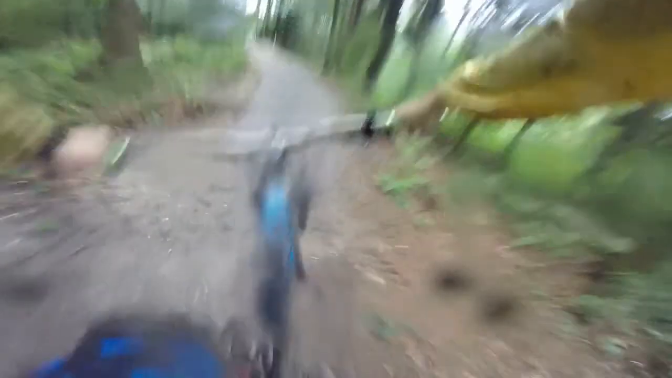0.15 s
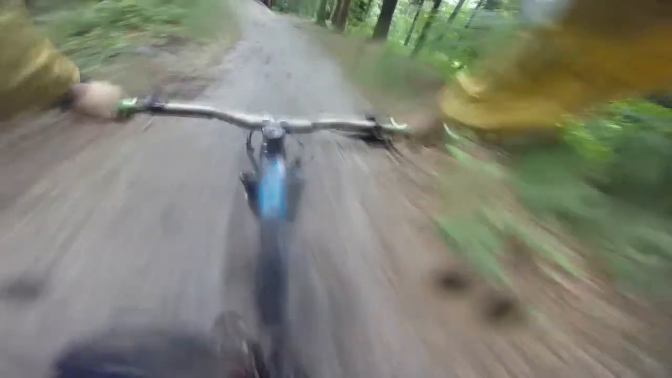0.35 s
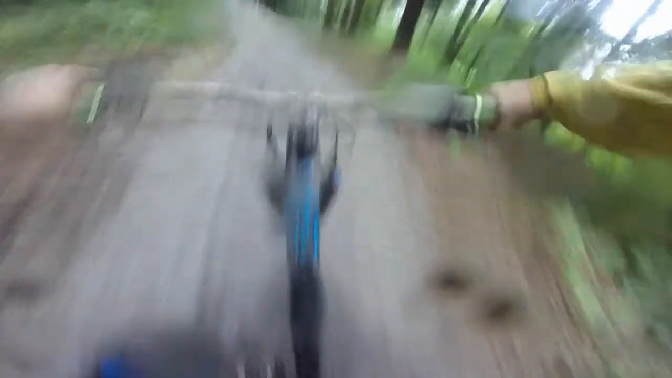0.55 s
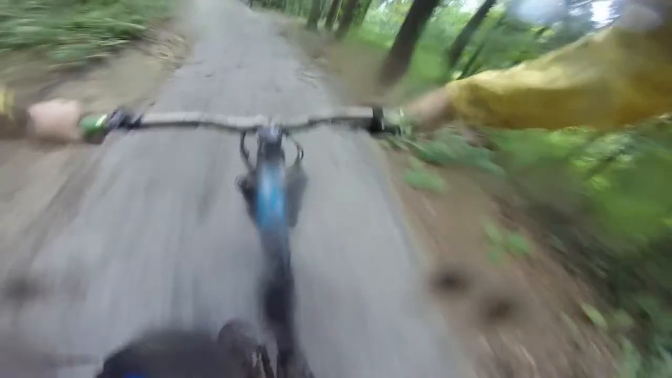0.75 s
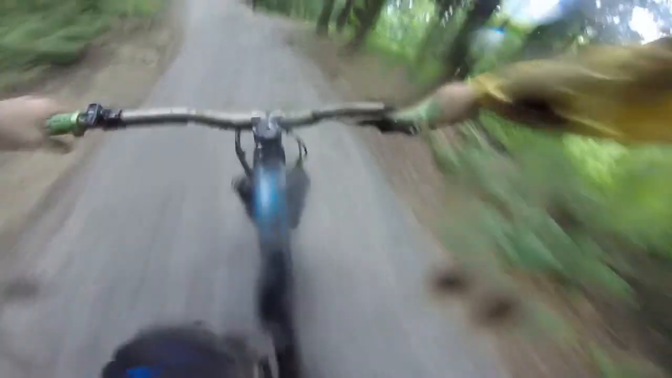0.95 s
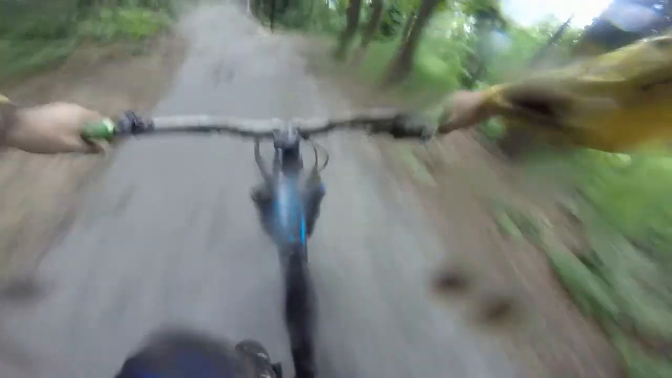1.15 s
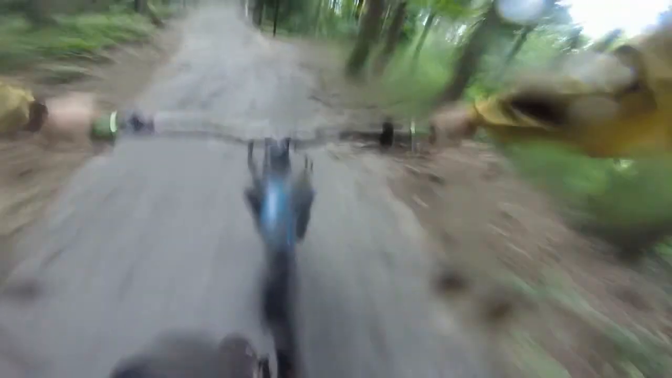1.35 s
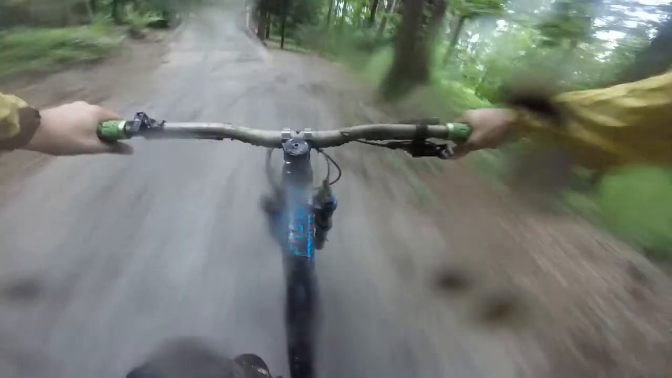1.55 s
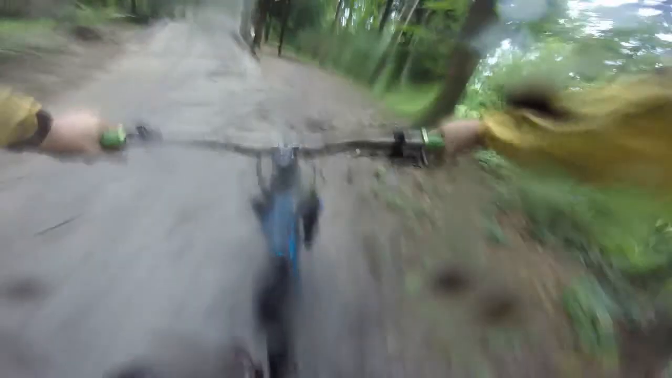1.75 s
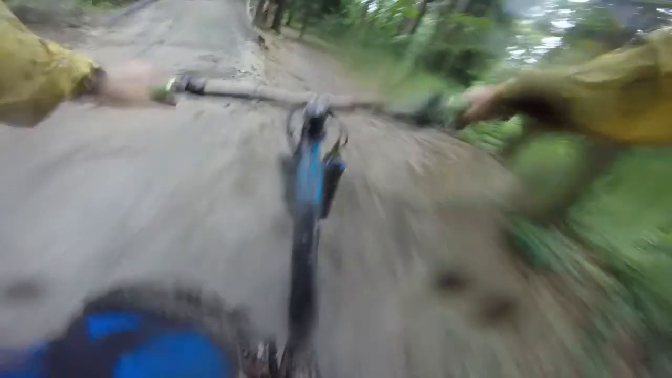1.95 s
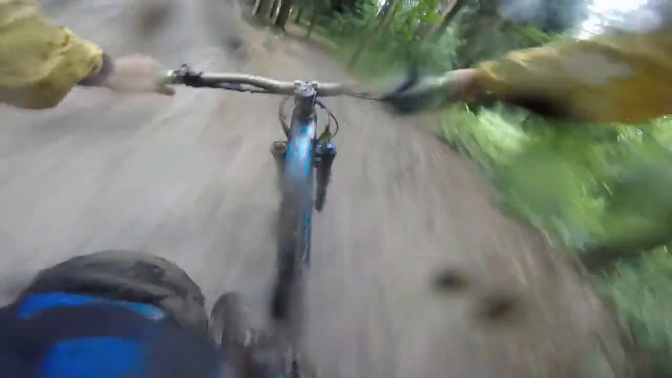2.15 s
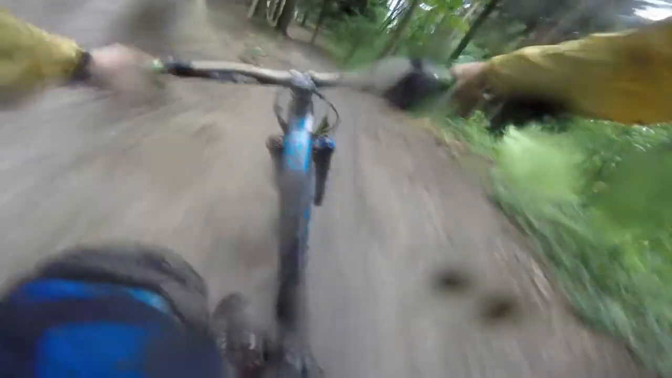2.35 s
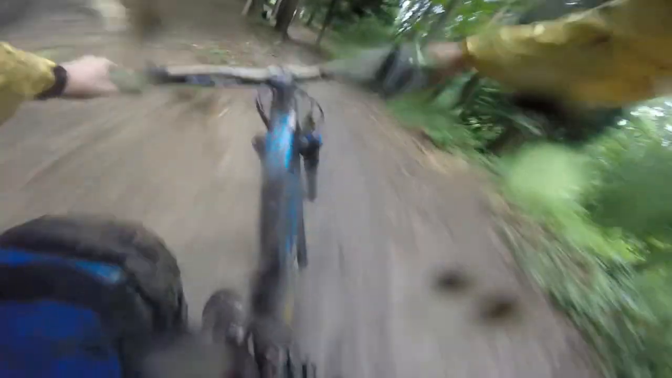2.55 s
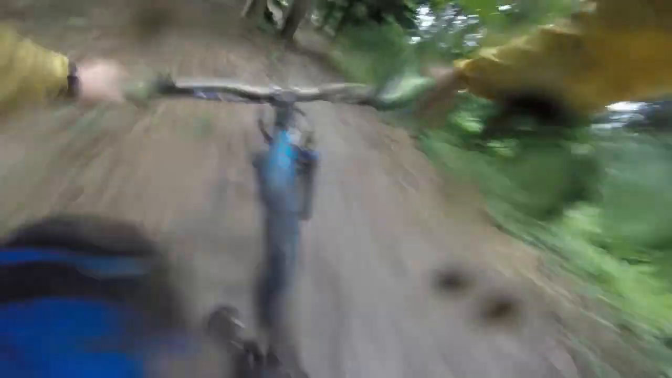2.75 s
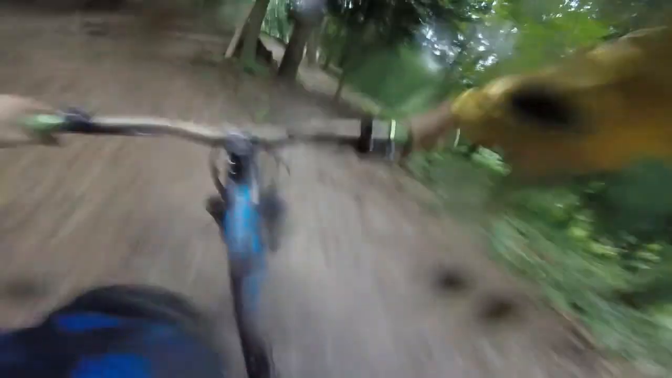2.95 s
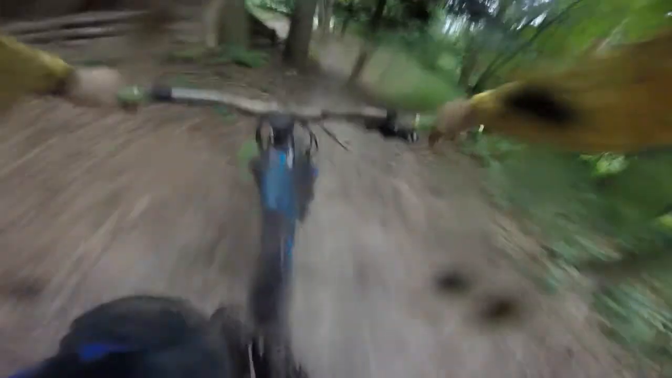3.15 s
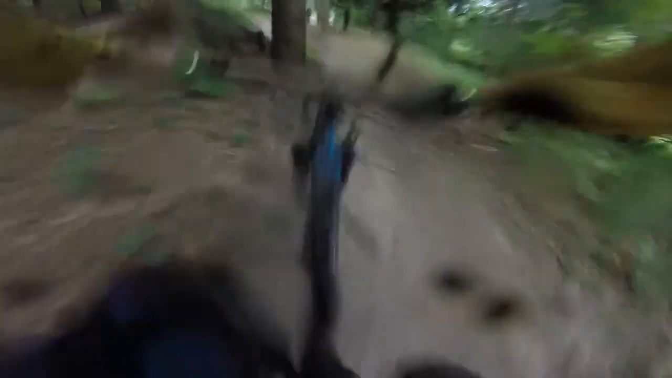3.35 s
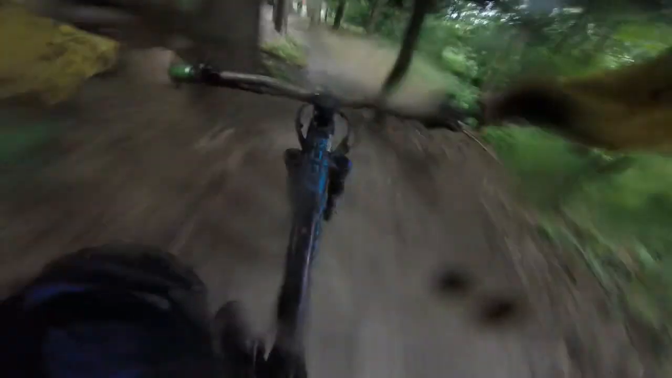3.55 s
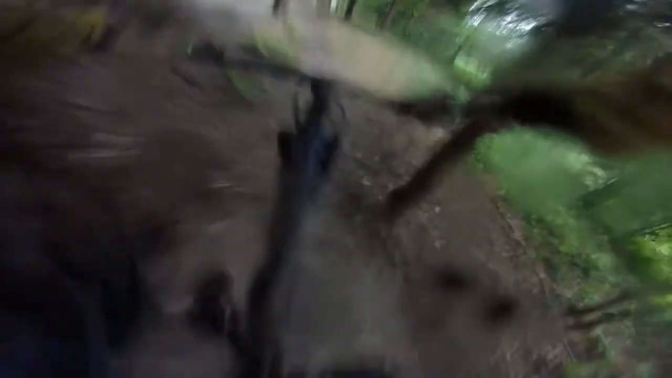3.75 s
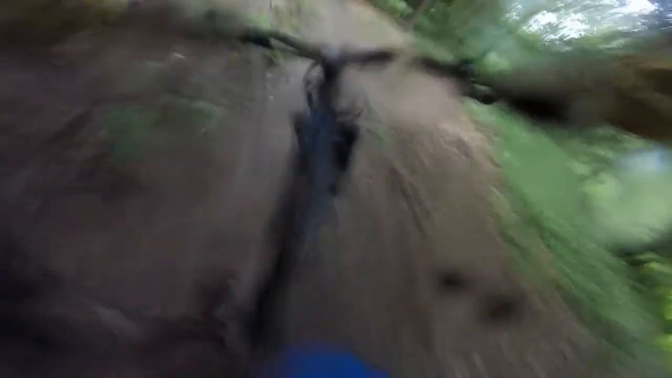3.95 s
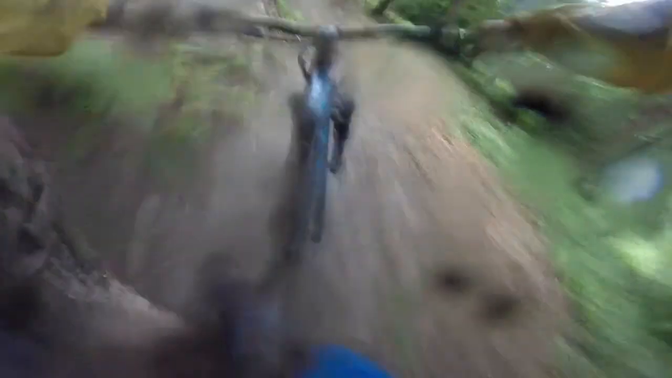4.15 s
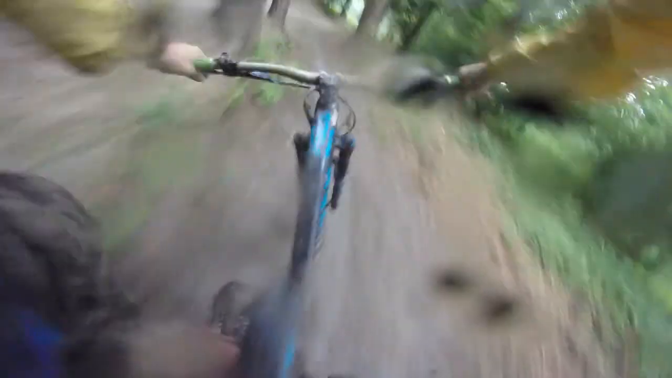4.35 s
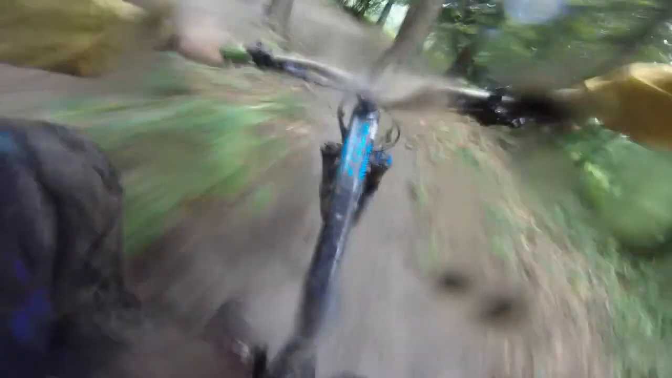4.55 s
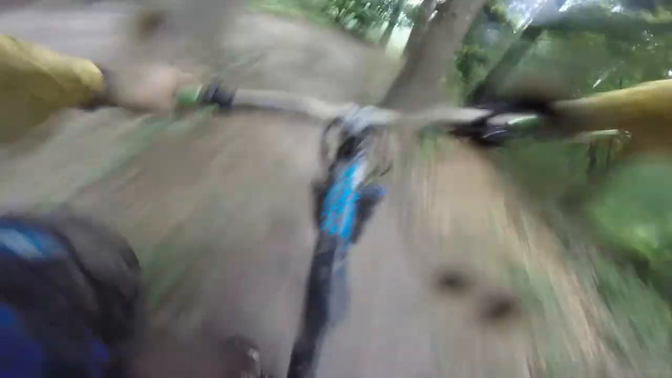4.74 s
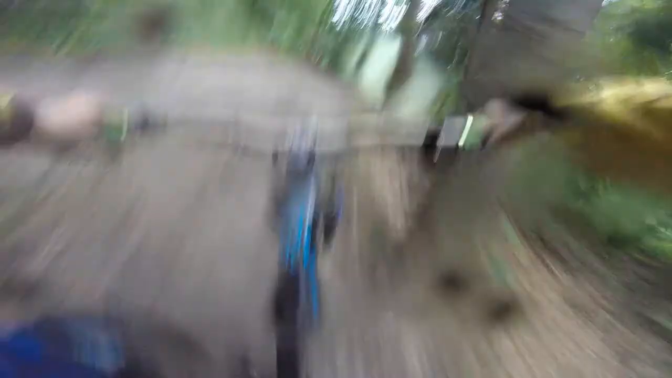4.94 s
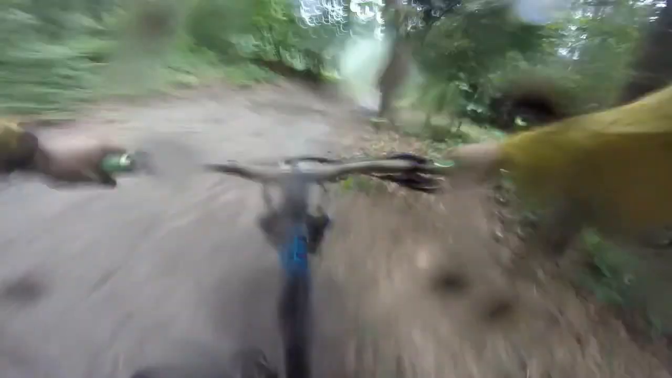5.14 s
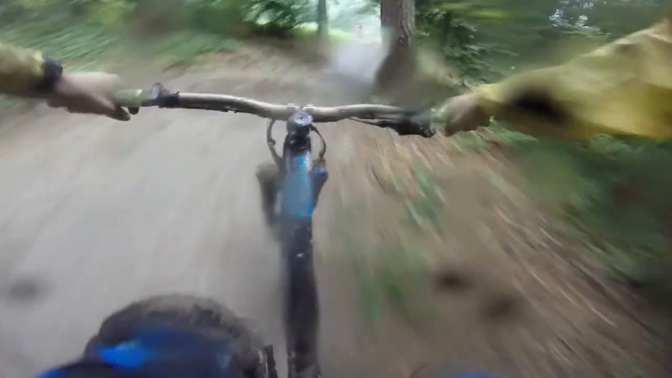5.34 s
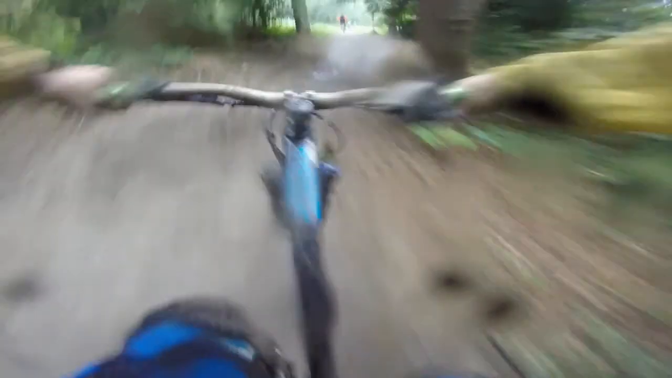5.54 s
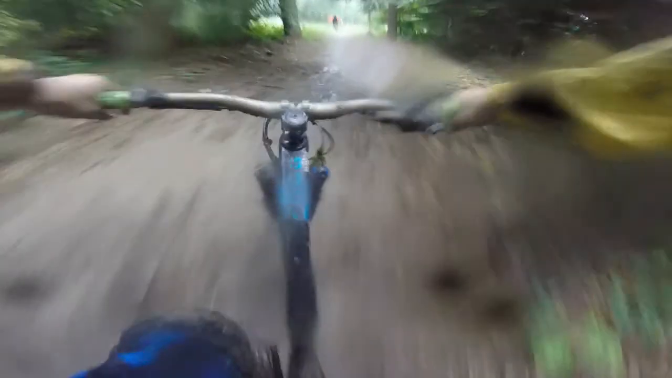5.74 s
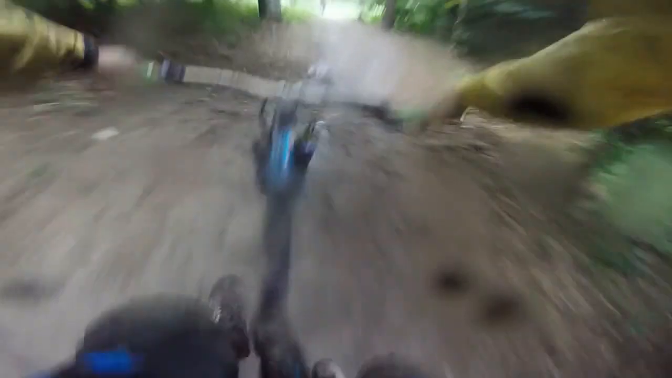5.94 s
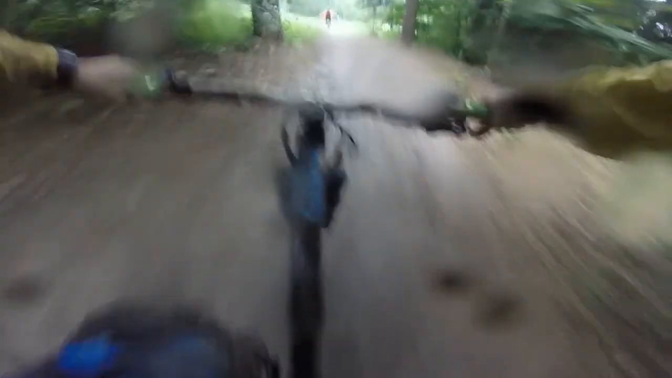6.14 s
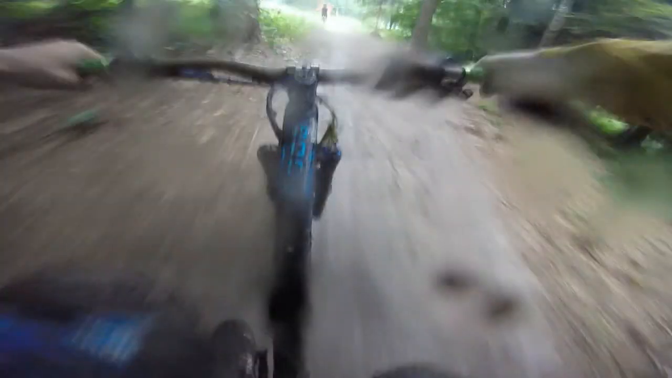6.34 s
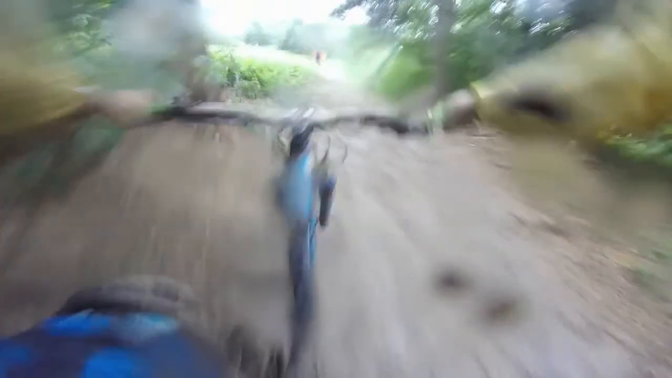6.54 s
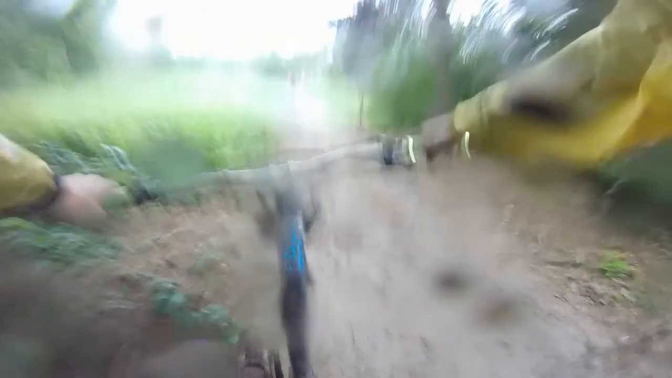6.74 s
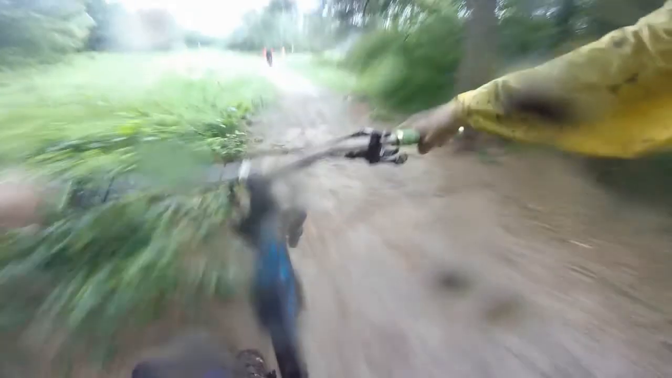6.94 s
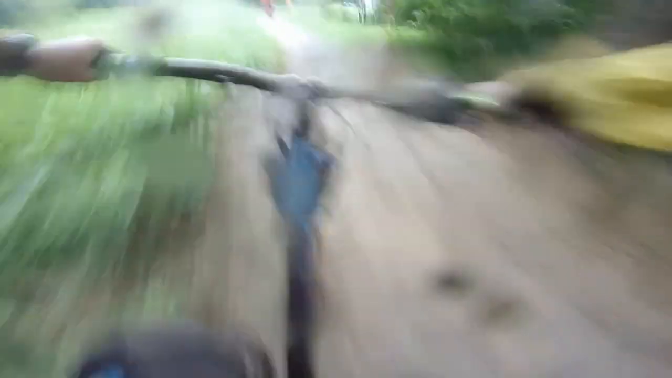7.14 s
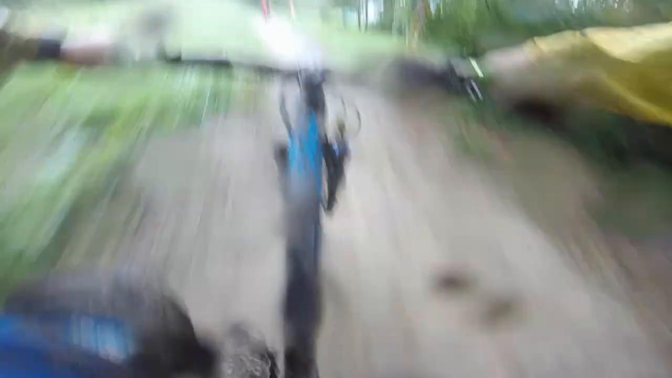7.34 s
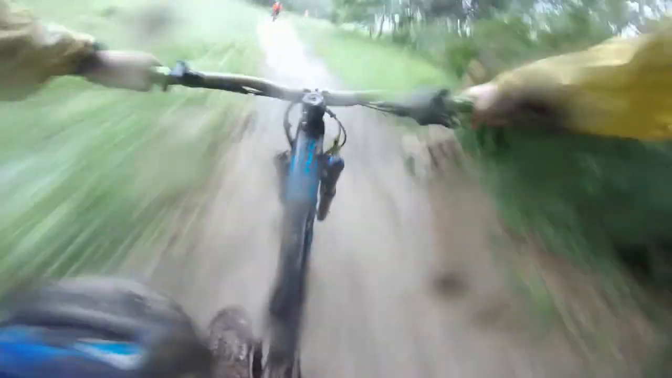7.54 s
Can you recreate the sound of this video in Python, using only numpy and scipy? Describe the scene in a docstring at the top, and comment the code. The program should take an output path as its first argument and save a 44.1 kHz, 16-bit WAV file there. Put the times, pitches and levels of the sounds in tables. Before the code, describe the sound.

Close rattling, clacks and hollow thuds of a mountain bike speeding over gritty dirt, with hissing brakes and buffeting air.

```python
"""Mountain bike on a dirt trail.

A fast descent, heard from a cased camera on the rider's chest. Tyres crunch over grit, disc brakes
hiss and briefly squeal, chain and cables clack against the frame. Air buffets the case;
bumps knock the camera mount and push deep thuds into the case."""
import sys
import numpy as np
from scipy import signal
from scipy.fft import rfft, irfft
from scipy.io import wavfile
from scipy.ndimage import uniform_filter1d

SR = 44100
rng = np.random.default_rng(int(sys.argv[2]) if len(sys.argv) > 2 else 0)


def pcm_store(signal):
    """Save signal as 16-bit PCM."""
    levels = np.round(np.clip(np.atleast_2d(signal), -1, 1) * 32767)
    wavfile.write(sys.argv[1], SR, levels.astype(np.int16).T)


N = 339129
TIME = np.arange(N) / SR
LEAD_S = 0.008  # a brief swell of noise leads into each hit

# Knocks on the camera mount. Each row: start in seconds, crack level in dB, ring in Hz,
# boom level in dB, hollow level in dB; boom and hollow before the trims in mount_knocks().
MOUNT_KNOCKS = [(0.035, -10, 1900, -26, -33), (0.511, -16, 1160, -17, -24), (0.594, -26, 1300, -40, -45),
                (0.606, -20, 1220, -31, -25.5), (0.613, -30, 1190, -20, -30), (0.6849, -6, 2020, -10, -12),
                (1.202, -32.5, 1190, -31, -48), (1.534, -23.5, 1180, -26, -46),
                (1.641, -37, 1100, -29, -36), (2.075, -25.5, 1170, -23.5, -58),
                (2.227, -28.5, 1200, -28, -39), (2.348, -18.5, 1830, -34, -33.5),
                (2.462, -16.5, 1220, -28, -52), (2.859, -24, 1180, -24.5, -42),
                (2.981, -27, 2170, -32, -34), (3.092, -24, 1700, -42, -55), (3.14, -21.5, 2220, -24, -29),
                (3.511, -15.5, 2200, -22.5, -27), (3.556, -48, 2760, -23.5, -51),
                (3.976, -21, 1180, -14.5, -27), (4.046, -26, 1070, -17, -26.5),
                (4.079, -21, 1260, -49, -37), (4.166, -15, 1220, -20.5, -26.5),
                (4.238, -22, 2230, -18.5, -26.5), (4.276, -21, 1880, -33, -32),
                (4.395, -20, 2220, -40, -28.5), (4.43, -15, 1930, -24, -27.5),
                (4.445, -2.5, 2300, -15, -28), (4.591, -21.5, 1150, -24, -33.5),
                (4.893, -22, 1170, -24, -31), (4.961, -4, 2850, -9, -7.5), (5.233, -37, 2330, -31, -37),
                (5.308, -24, 2580, -30, -30), (5.611, -24.5, 1140, -18.5, -37),
                (5.652, -33, 1230, -24, -41), (6.0521, -17.5, 1120, -21.5, -25),
                (6.364, -18, 2180, -32.5, -30), (6.533, -22, 1130, -18.5, -53),
                (6.618, -19.5, 1850, -13, -47), (6.715, -16, 2240, -16, -21.5),
                (6.757, -6.5, 1940, -16, -29), (6.839, -12.5, 2340, -13, -21),
                (7.241, -21.5, 1150, -19.5, -30.5)]
# Modes of frame and chain. Each row: frequency in Hz, gain in dB, t60 in seconds.
FRAME_MODES = [(1500, 5.5, 0.0043), (2060, -6, 0.03), (2293, -5.5, 0.027), (2620, -1, 0.017),
               (3426, -8.5, 0.011), (3704, -19, 0.039)]


def undb(db):
    """Decibels to gain."""
    return 10 ** (np.asarray(db) / 20)


def unit(x):
    """Scale to rms 1."""
    return x / np.sqrt(np.mean(x ** 2))


def peak(x, db):
    """Scale to a peak level."""
    return x * undb(db) / np.abs(x).max()


def add(out, start_s, x):
    """Mix x into out."""
    i = int(start_s * SR)
    x, i = x[max(-i, 0):], max(i, 0)
    out[i:i + len(x)] += x[:N - i]


def curve(table):
    """Each value column of (seconds, value, ..) rows, interpolated linearly."""
    times_s, *columns = np.transpose(table)
    return [np.interp(TIME, times_s, column) for column in columns]


def swells(table):
    """Gaussian humps in dB from (centre in seconds, half length in seconds, dB) rows."""
    return sum(db * np.exp(-((TIME - centre_s) / half_s) ** 2) for centre_s, half_s, db in table)


def band(x, lo_hz, hi_hz):
    """Butterworth band-pass."""
    return signal.sosfilt(signal.butter(2, [lo_hz, hi_hz], "band", fs=SR, output="sos"), x)


def colour(x, spectrum, size=2048):
    """Minimum-phase filter through (Hz, dB) points."""
    hz, db = np.transpose(spectrum)
    grid_hz = np.maximum(np.arange(size // 2 + 1) * SR / size, 1)
    gain = undb(np.interp(np.log(grid_hz), np.log(hz), db))
    cepstrum = irfft(np.log(gain))
    cepstrum[1:size // 2] *= 2
    cepstrum[size // 2 + 1:] = 0
    return signal.fftconvolve(x, irfft(np.exp(rfft(cepstrum))))[:len(x)]


def ring(push, modes, detune=0.0):
    """Damped modes driven by a push; each blow lands elsewhere and detunes them a little."""
    t = TIME[:len(push)]
    response = np.zeros(len(push))
    for hz, db, t60_s in modes:
        hz = hz * (1 + detune * rng.standard_normal())
        response += undb(db) * np.cos(2 * np.pi * hz * t) * undb(-60 * t / t60_s)
    return signal.fftconvolve(push, response)[:len(push)]


def walk(rate_hz):
    """Random steps, smoothed twice, at rms 1."""
    hold = int(SR / rate_hz)
    steps = np.repeat(rng.standard_normal(N // hold + 1), hold)
    return unit(uniform_filter1d(uniform_filter1d(steps, hold), hold)[:N])


def grains(per_s, spread_db):
    """Random impulses, many small and a few large."""
    height = undb(spread_db * np.minimum(rng.exponential(size=N), 5))
    return (rng.random(N) < per_s / SR) * height * rng.choice([-1, 1], N)


def contacts(span_s, scrape_s, shiver_db, shiver_s, count, scatter_db=3.5, size=4000):
    """Quick scraping contacts of uneven force; loose parts shiver on after them."""
    t = TIME[:size] - LEAD_S
    push = np.zeros(size)
    for when_s in span_s * (np.arange(count) + rng.random(count) / 2) / count:
        push += undb(scatter_db * rng.standard_normal()) * np.exp(-np.abs(t - when_s) / scrape_s)
    lead_in = np.exp(np.minimum(t, 0) / 0.0012)
    shiver = undb(shiver_db) * lead_in * np.exp(-np.maximum(t, 0) / shiver_s)
    return (push + shiver) * rng.standard_normal(size)


def buffeting(trim_db=1.5):
    """Gusts and body sway buffet the case in lumps."""
    # Each row: time in seconds, level before trim in dB.
    gusts = [(0, -26.5), (.4, -41), (.64, -28), (.9, -45.5), (1.25, -32), (1.6, -36.5), (2.7, -31),
             (2.9, -28.5), (3.35, -33), (4.4, -28.5), (4.9, -27), (5.05, -35.5), (5.95, -41), (6.3, -30.5),
             (6.7, -27), (6.98, -63.5), (7.35, -30), (7.69, -35)]
    # Each row: frequency in Hz, relative density in dB.
    buffet_spectrum = [(5, 7), (13, 5), (22, 10.5), (38, -8), (60, -15.5), (100, -17.5), (200, -46),
                       (2000, -120)]
    level_db, = curve(gusts)
    rumble = unit(colour(rng.standard_normal(N), buffet_spectrum, size=32768))
    return rumble * undb(level_db + trim_db + 2.55 * walk(rate_hz=7.2))


def mount_drone(level_db, trim_db=5.7):
    """Small bumps keep the camera mount droning."""
    # Each row: frequency in Hz, relative density in dB.
    drone_spectrum = [(20, -43), (60, 0), (90, -8), (150, 0), (208, -1), (250, -6.5), (320, -17),
                      (500, -32.5), (900, -81), (4000, -100)]
    drone = unit(colour(grains(per_s=170, spread_db=3), drone_spectrum, size=8192))
    return drone * undb(level_db + trim_db + 2 * walk(rate_hz=25))


def brake_hiss(graze_db=-66, trim_db=4):
    """Dusty pads slip on the rotor and excite its broad resonances; released, they still graze it."""
    # Lever pulls. Each row: start, length, squeeze and release in seconds, level before trim in dB.
    pulls = [(0.452, 0.17, 0.0069, 0.059, -50), (.75, 0.14, 0.047, .05, -60),
             (1.672, 0.054, 0.046, 0.051, -53.5), (2.22, 0.75, 0.26, .09, -51), (3.81, 1, 0.091, 0.08, -63),
             (6.51, 0.21, 0.11, 0.044, -59), (7.246, 0.41, 0.058, .05, -67)]
    # Each row: frequency in Hz, relative density in dB.
    rotor_spectrum = [(1200, -22), (2300, -14), (2900, 6.5), (3300, -4), (3800, 1.5), (4600, -12.5),
                      (6100, -2), (7700, -9.5), (9000, -3.5), (10500, -18), (12500, -22), (15000, -33)]
    drag = undb(graze_db)
    for start_s, length_s, squeeze_s, release_s, db in pulls:
        t = TIME - start_s
        grip = np.clip(t / squeeze_s, 0, 1) * np.exp(-np.maximum(t - length_s, 0) / release_s)
        drag = np.hypot(drag, undb(db) * grip)
    pressure = undb(1.8 * walk(rate_hz=70))
    slips = grains(per_s=9000, spread_db=3.5) * pressure
    return unit(colour(slips, rotor_spectrum)) * drag * undb(trim_db)


def brake_squeals(waver=0.03):
    """The rotor catches a pad and sings for an instant on an unsteady pitch."""
    # Each row: centre in seconds, half length in seconds, pitch in Hz, peak in dB.
    squeals = [(2.363, 0.0024, 7060, -33), (2.832, 0.0029, 2005, -25), (3.046, .008, 6840, -35),
               (3.096, 0.0016, 1674, -14)]
    clock_s = np.cumsum(1 + waver * walk(rate_hz=900)) / SR
    out = np.zeros(N)
    for centre_s, half_s, hz, db in squeals:
        envelope = undb(db) * np.exp(-((TIME - centre_s) / half_s) ** 2)
        out += envelope * np.sin(2 * np.pi * hz * clock_s)
    return out


def tyre_bite_db(over_boom_db=15.5, rise_s=0.0043, fall_s=0.014):
    """Extra crunch as the tyres press into each bump; a heavier boom means a harder bite."""
    load = np.ones(N)
    for start_s, _, _, boom_db, _ in MOUNT_KNOCKS:
        near = np.abs(TIME - start_s) < 0.2
        t = TIME[near] - start_s
        load[near] += undb(boom_db + over_boom_db) * np.exp(np.minimum(t / rise_s, -t / fall_s))
    return 20 * np.log10(load)


def tyres(crunch_db, grit_db=1.35, pebble_db=-6.65, skitter_s=0.0087):
    """Knobs crush dense grit in uneven patches and flick pebbles that scrape the frame."""
    # Each row: frequency in Hz, relative density in dB.
    grit_spectrum = [(150, -27), (330, 0.5), (450, -4), (820, -11), (1200, -1.5), (1650, -5.5), (2150, -2),
                     (2900, -10.5), (3300, -12.5), (4300, -29), (7000, -47), (9500, -65), (12000, -63),
                     (16000, -39)]
    patches = undb(2.4 * walk(rate_hz=70))
    grit = unit(colour(grains(per_s=3500, spread_db=2.5) * patches, grit_spectrum))
    flicks = np.abs(grains(per_s=50, spread_db=4))
    skitter = np.exp(-TIME[:SR // 50] / skitter_s)
    scrapes = signal.fftconvolve(flicks, skitter)[:N] * rng.standard_normal(N)
    pebbles = unit(band(ring(scrapes, FRAME_MODES), 1070, 5900))
    return (undb(grit_db) * grit + undb(pebble_db) * pebbles) * undb(crunch_db)


def slap(span_s, ring_hz, frame_db, steel_db, ring_t60_s=0.016, jitter_s=0.0063):
    """Steel slides and lands in four contacts: ticks over a short ring of the frame, which jitters on."""
    # Each row: frequency in Hz, relative density in dB.
    steel_spectrum = [(2500, -22.5), (4200, 1.5), (5300, 12), (6800, 13.5), (8200, 13), (10500, 3),
                      (15000, -9)]
    push = contacts(span_s, scrape_s=0.0004, shiver_db=-18, shiver_s=0.003, count=4)
    t = TIME[:len(push)] - LEAD_S
    slide_s = 0.36 * span_s + 0.00089
    slide = undb(-10.5) * np.exp(-np.abs(t - span_s / 2) / slide_s) * rng.standard_normal(len(t))
    jitter = undb(-25) * (t > 0) * np.exp(-np.abs(t) / jitter_s) * rng.standard_normal(len(t))
    frame = ring(push + slide + jitter, FRAME_MODES + [(ring_hz, -1, ring_t60_s)], detune=0.023)
    ticks = colour(push + slide, steel_spectrum, size=256)
    return peak(band(frame, 410, 4380), frame_db) + peak(ticks, steel_db)


def cable_rattles(crunch_db, per_s=7, scatter_db=6):
    """Cables tap the frame at random, harder where the ground is rough."""
    out = np.zeros(N)
    for when, force in rng.random((int(per_s * N / SR), 2)):
        db = crunch_db[int(when * N)] + scatter_db * (2 * force - 1)
        tap = slap(span_s=0.00433, ring_hz=2650, frame_db=db + 10, steel_db=db + 3.5)
        add(out, when * N / SR, tap)
    return out


def chain_clacks(stay_hz=2270, spread_octaves=0.11, frame_trim_db=1, steel_trim_db=-1.67):
    """The chain hits the stay; some slaps land flat, others roll along it."""
    # Each row: start in seconds, frame and steel levels before trim in dB, landing span in seconds.
    slaps = [(0.0077, -12.5, -19, 0.0021), (0.072, -18, -28.5, 0.0057), (0.1507, -18, -26, 0.003),
             (0.192, -25.5, -39.5, 0.0087), (0.2172, -25.5, -25.0, 0.003), (0.273, -25, -30, 0.01),
             (0.354, -30, -38, 0.0106), (0.4722, -29, -22.5, 0.0087), (0.6348, -22.5, -25.5, 0.0058),
             (0.671, -33, -26, 0.0029), (0.7683, -25, -28, 0.013), (0.832, -28.5, -32, 0.012),
             (0.8767, -21, -26, 0.0093), (0.9628, -29, -27.5, 0.0093), (1.308, -34.0, -43, 0.0024),
             (1.3487, -23.5, -29.5, 0.0045), (1.447, -20.5, -26, 0.0081), (1.5732, -28, -36, 0.0032),
             (1.6472, -41, -35.5, 0.0074), (1.794, -27.5, -37, 0.0013), (1.8274, -26.5, -30, 0.0056),
             (1.9441, -31.5, -37, 0.0017), (1.991, -29, -29.5, 0.0078), (2.1389, -37.5, -30, 0.005),
             (2.3476, -22.5, -22.5, 0.013), (2.397, -24.5, -27, 0.0066), (2.7843, -23.5, -25.0, 0.003),
             (2.808, -18, -27, 0.0026), (2.8324, -23, -31, 0.002), (2.8463, -25.0, -32.5, 0.0089),
             (2.8828, -21, -28.5, 0.0036), (2.9835, -25, -32, 0.0025), (3.0511, -17, -22, 0.01),
             (3.0879, -18.5, -30, 0.0096), (3.148, -22.5, -22.5, 0.0038), (3.2267, -21.5, -24.5, 0.0077),
             (3.271, -36.0, -33.5, 0.0046), (3.3224, -25, -32.5, 0.0062), (3.3757, -28.5, -37.5, 0.0079),
             (3.511, -25.5, -27.5, 0.0035), (3.567, -23, -26, 0.0042), (3.7206, -30, -61, 0.0096),
             (3.8633, -24.5, -36, 0.0065), (3.8908, -24, -33.5, 0.0072), (3.9061, -27.5, -24, 0.0041),
             (3.935, -33, -25.5, 0.0049), (3.9486, -33, -25.0, 0.0025), (3.9558, -23.5, -23.5, 0.012),
             (4.0548, -17.5, -26.5, 0.0047), (4.1102, -22, -22, 0.0085), (4.2602, -19.5, -25, 0.0024),
             (4.2986, -29.0, -30.5, 0.0032), (4.3183, -15.5, -30, 0.0082), (4.3944, -14, -18, 0.002),
             (4.5047, -18, -28.5, 0.013), (4.5811, -25, -30.0, 0.0026), (4.6193, -24, -25.5, 0.0045),
             (4.682, -44, -31.5, 0.0024), (4.747, -30.5, -33, 0.0022), (4.7827, -30, -49, 0.0121),
             (4.8225, -32, -29, 0.0059), (4.9619, -14, -20.5, 0.0012), (4.9904, -19, -28, 0.0022),
             (5.041, -31.5, -31, 0.0052), (5.112, -34, -37, 0.012), (5.1347, -28.5, -43.5, 0.0021),
             (5.1982, -26.5, -30.5, 0.0027), (5.2612, -25.5, -37.0, 0.011), (5.3109, -22, -26.5, 0.0041),
             (5.3408, -29, -35, 0.006), (5.3837, -28.5, -41, 0.0027), (5.3992, -30.5, -34, 0.0025),
             (5.4428, -21.5, -28.0, 0.0074), (5.503, -26.0, -31, 0.0017), (5.583, -26.0, -32.5, 0.006),
             (5.9097, -25.0, -38, 0.0042), (5.9747, -31.5, -36, 0.01), (5.9874, -29, -27.5, 0.016),
             (6.1146, -29, -23, 0.0093), (6.1257, -23.5, -26.5, 0.0078), (6.2085, -26.5, -23.5, 0.0053),
             (6.2557, -29, -32.5, 0.011), (6.367, -18.5, -20.5, 0.0023), (6.387, -24.5, -23.0, 0.0075),
             (6.4192, -22.5, -27, 0.0095), (6.479, -21.5, -29.0, 0.0035), (6.517, -24.5, -24, 0.0039),
             (6.717, -17.0, -16.5, 0.0016), (6.7564, -21, -30, 0.0062), (6.7718, -31, -28.5, 0.0039),
             (6.8402, -14, -19.5, 0.0065), (6.8996, -21, -26, 0.0069), (6.912, -36, -31, 0.0095),
             (6.98, -36.0, -48.0, 0.0074), (7.1643, -29, -33.5, 0.0028), (7.2185, -30, -24, 0.0076),
             (7.2328, -28, -33.5, 0.0048), (7.317, -25.5, -21.5, 0.0068), (7.4137, -28, -33, 0.002),
             (7.4375, -28, -29, 0.0043), (7.4719, -27, -26, 0.0064), (7.5283, -24, -30, 0.0027),
             (7.5673, -35, -26, 0.0017), (7.5763, -26, -29, 0.013), (7.6074, -26, -33, 0.0017),
             (7.657, -21, -24.5, 0.011)]
    out = np.zeros(N)
    for start_s, frame_db, steel_db, span_s in slaps:
        ring_hz = stay_hz * 2 ** (spread_octaves * rng.standard_normal())
        clack = slap(span_s, ring_hz, frame_db + frame_trim_db, steel_db + steel_trim_db)
        add(out, start_s - LEAD_S, clack)
    return out


def case_thuds(rebound=0.24):
    """Each bump squeezes the case: a short push of pressure, then a deep dip that swells back."""
    # Each row: dip centre in seconds, peak in dB, half width in seconds, relative push height.
    bumps = [(0.018, -8, 0.011, 0.72), (0.16, -16, 0.012, 0.25), (.642, -15.5, 0.0084, .2),
             (0.773, -22, 0.0054, 0.33), (2.36, -12, 0.013, 0.14), (2.818, -16.5, 0.0088, 0.11),
             (2.997, -19.5, 0.02, 0.089), (3.150, -14.5, 0.0092, 0.86), (3.522, -12, 0.01, 0.84),
             (4.059, -7, 0.0073, 0.55), (4.271, -7.5, 0.0097, 0.67), (4.409, -6, 0.01, 0.73),
             (4.496, -13.5, 0.018, 0.24), (4.997, -10, 0.0102, 1), (6.225, -22, 0.01, 0.14),
             (6.371, -11, 0.0067, 0.29), (6.728, -1.5, 0.0075, 0.42), (6.852, -14, 0.011, 0.67),
             (7.218, -21, 0.0091, 0.2), (7.418, -14, .010, 0.36)]
    out = np.zeros(N)
    for centre_s, db, half_s, push_height in bumps:
        near = np.abs(TIME - centre_s) < 0.12
        u = (TIME[near] - centre_s) / half_s
        dip = rebound * np.exp(-(u / 2.55) ** 2) - np.exp(-u ** 2)
        push = push_height * np.exp(-(5.4 * (u + 1.413)) ** 2)
        out[near] += peak(dip + push, db)
    return out


def mount_knocks(boom_trim_db=3, hollow_trim_db=2, ring_t60_s=0.015):
    """The mount takes up its slack: the case cracks, rings hollow and booms on its bracket."""
    # Modes of mount and case. Each row: frequency in Hz, gain in dB, t60 in seconds.
    boom_modes = [(201, 3, 0.077), (168, -1.5, 0.068), (250, -36, 0.013), (106, -7.5, 0.097)]
    hollow_modes = [(466, 8.5, 0.021), (610, -3, 0.015), (935, 1.5, 0.01)]
    case_modes = [(1130, -18, 0.047), (1216, -1.5, 0.018), (1508, 4, 0.01), (1990, 3.5, 0.016),
                  (2670, -7, 0.016), (3150, -6, 0.027), (4050, -48, 0.002), (5840, 0, 0.006)]
    out, blow = np.zeros(N), signal.unit_impulse(4000)
    for start_s, crack_db, ring_hz, boom_db, hollow_db in MOUNT_KNOCKS:
        push = contacts(span_s=0.00276, scrape_s=0.00037, shiver_db=-37, shiver_s=0.0028, count=2)
        case = ring(push, case_modes + [(ring_hz, 9, ring_t60_s)], detune=0.022)
        crack = band(case, 760, max(1.65 * ring_hz, 1500))  # a higher ring opens the treble
        hollow = band(ring(blow, hollow_modes, detune=0.025), 250, 900)
        boom = band(ring(blow, boom_modes, detune=0.041), 55, 368)
        add(out, start_s + 0.000974 - LEAD_S, peak(crack, crack_db))
        add(out, start_s + 0.0011, -peak(boom, boom_db + boom_trim_db))
        add(out, start_s + 0.00085, -peak(hollow, hollow_db + hollow_trim_db))
    return out


def scene(gravel_shake=0.75):
    """All sources close to one microphone; no echo in the open wood."""
    # Trail roughness. Each row: time in seconds, base crunch in dB, base mount drone in dB.
    roughness = [(0, -42.5, -30.5), (.28, -47.5, -42), (.46, -44, -50.5), (.62, -43, -35.5),
                 (.93, -51.5, -48.5), (2.7, -50.5, -49), (2.95, -41, -41), (3.25, -50.5, -46),
                 (3.76, -50.5, -51.5), (4.05, -41, -36.5), (4.35, -42.5, -36), (4.6, -46, -45.5),
                 (5.1, -51, -48), (6.0, -51.5, -49.5), (6.45, -47.5, -48.5), (6.7, -42.5, -30),
                 (7.05, -47.5, -44.5), (7.69, -49, -45)]
    # Hops and crests unload the tyres. Each row: centre and half length in seconds, drop in dB.
    hops = [(.32, 0.033, 13.5), (1.0, .05, 7), (1.08, .02, 0.5), (1.4, 0.02, 3), (5.29, 0.016, 13),
            (5.55, 0.019, 11), (5.95, .03, 4), (6.09, 0.023, 6), (7.04, 0.083, 6)]
    # Loose gravel. Each row: centre and half length in seconds, extra crunch in dB.
    gravel_patches = [(.54, 0.036, 6), (.61, 0.015, 4.5), (1.23, 0.064, 5), (1.6, 0.022, 8.5),
                      (1.78, 0.03, 3.5), (2.26, 0.086, 3), (2.41, .025, 9), (3.45, 0.067, 9.5),
                      (3.97, 0.049, 2.5), (4.76, 0.044, 4.5), (5.24, 0.057, 6), (5.34, 0.037, 6),
                      (5.46, 0.018, 5.5), (5.64, 0.14, 6), (6.27, 0.045, 9.5), (7.25, 0.04, 6.5),
                      (7.4, 0.062, 4.5)]
    ground_db, drone_db = curve(roughness)
    lift_db, gravel_db = swells(hops), swells(gravel_patches)
    crunch_db = ground_db + gravel_db + tyre_bite_db() - lift_db
    shake_db = drone_db + gravel_shake * gravel_db - lift_db
    rolling = tyres(crunch_db) + mount_drone(shake_db) + buffeting()
    braking = brake_hiss() + brake_squeals()
    impacts = case_thuds() + mount_knocks() + chain_clacks() + cable_rattles(crunch_db)
    return (rolling + braking + impacts)[None]


def record(dry, low_hz=2, top_hz=15300):
    """The camera blocks slow pressure drift, clips at full scale and cuts the top."""
    highpass = signal.butter(1, low_hz, "high", fs=SR, output="sos")
    lowpass = signal.ellip(8, 0.2, 70, top_hz, fs=SR, output="sos")
    clipped = np.clip(signal.sosfilt(highpass, dry), -1, 1)
    return signal.sosfilt(lowpass, clipped)


dry = scene()
out = record(dry)
pcm_store(out)
```